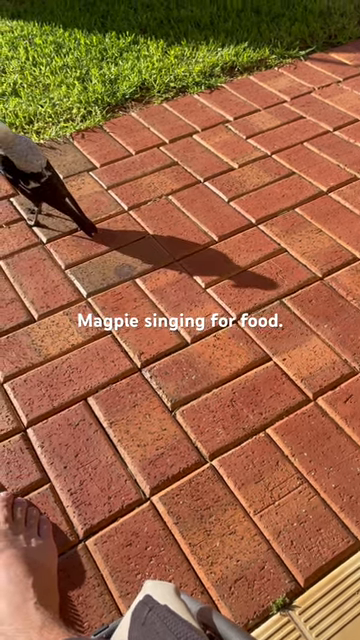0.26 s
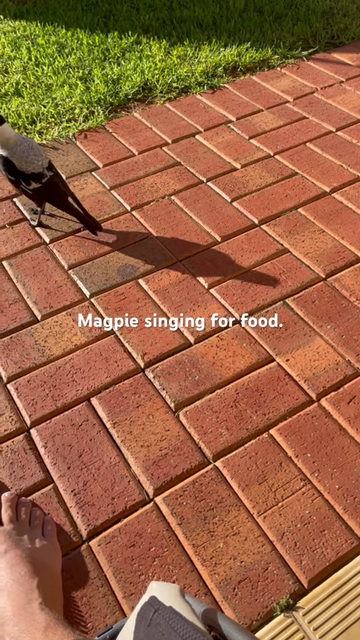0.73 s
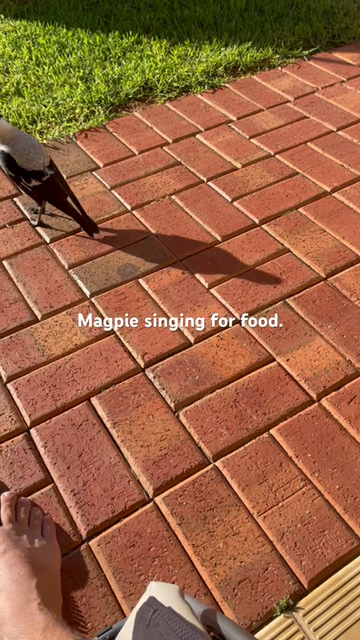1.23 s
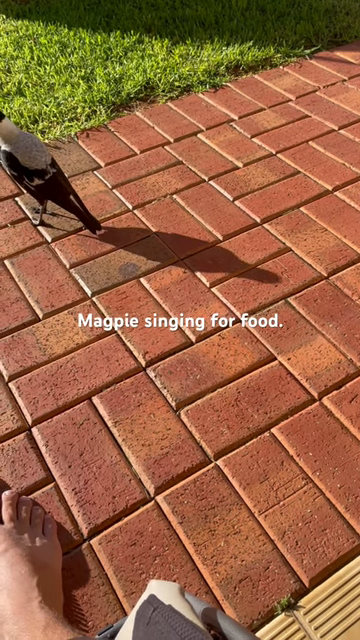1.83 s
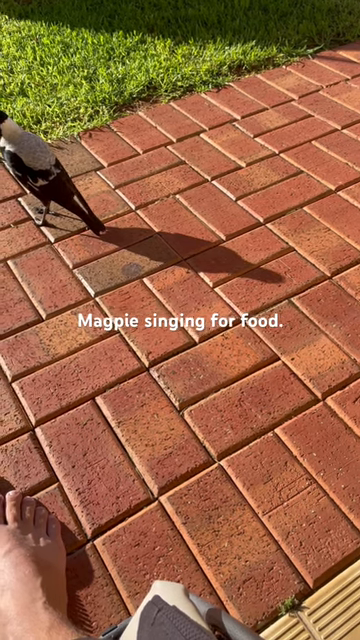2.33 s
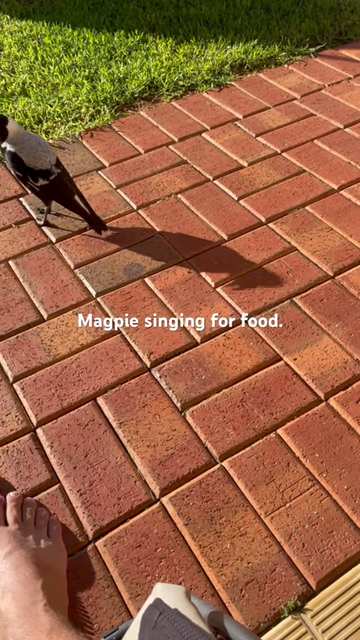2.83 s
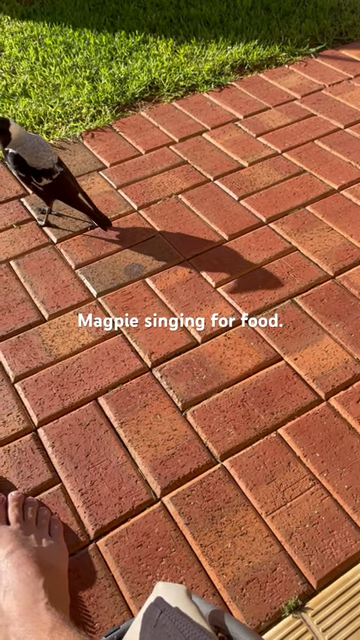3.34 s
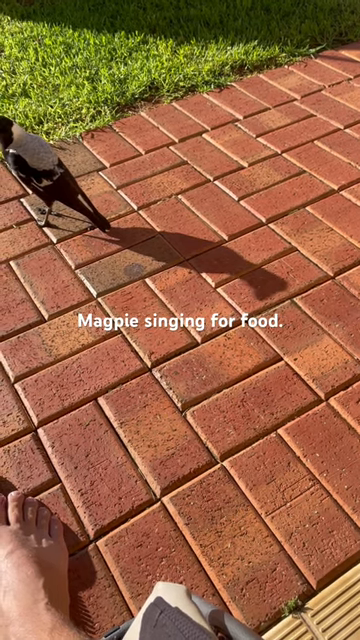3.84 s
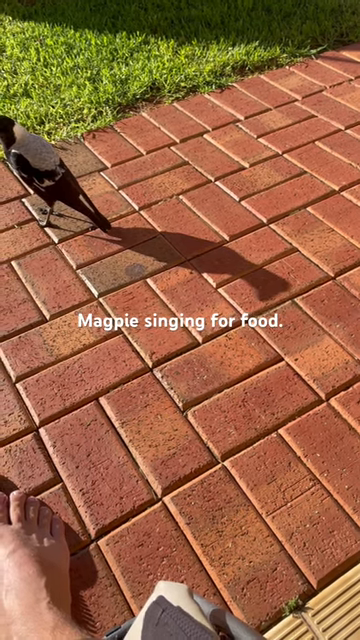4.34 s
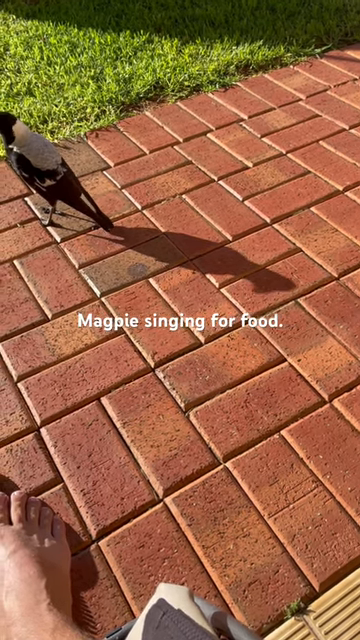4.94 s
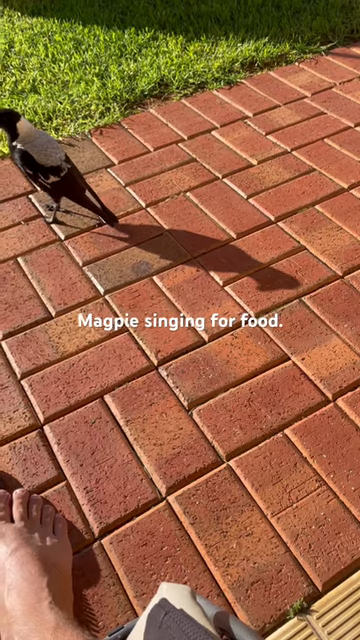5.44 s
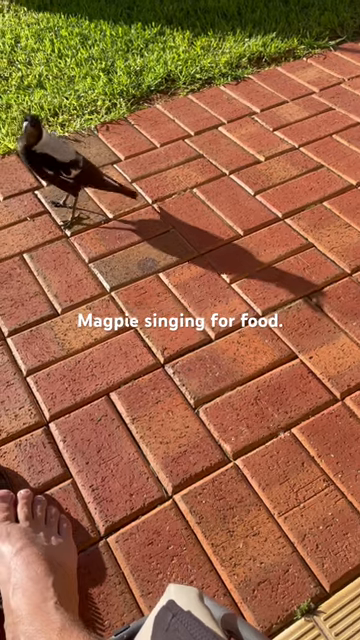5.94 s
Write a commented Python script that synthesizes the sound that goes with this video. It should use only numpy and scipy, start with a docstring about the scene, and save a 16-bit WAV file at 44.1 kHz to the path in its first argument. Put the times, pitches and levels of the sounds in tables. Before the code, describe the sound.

A magpie sings close to the microphone on a brick patio, with short reflections from nearby walls. It opens at once with a rapid fluttering warble falling away by 0.35 s, then a weaker swell and a brighter burst from 0.7 to 1.1 s. A sharp double-voiced slide comes at 1.16-1.3 s, with a short gargle near 1.4 s. From 1.5 to 2.7 s there are only faint chirps, soft rustles, dull taps and a small beak snap at 2.5 s. A harsh, breathy, two-toned squawk lasts from 2.77 to 3.0 s. Then fluting notes, quick upward flicks and gargling warbles follow in clusters, around 3.0-4.0 s, 4.1-4.55 s and 4.66-5.7 s, the last sagging and dying away. The final half second is nearly empty: echo tail, low traffic rumble, faint air and a distant motor hum, weaker than at the start.

```python
"""On a brick path a magpie sings close by: fluting notes, fast slides and gargling warbles from both sides of its
voice box, answered by nearby walls. Each note is a near sine with overtones, drawn as a curve of pitch and level.
A motor hums far off (two wavering sines) over low traffic rumble and air (shaped noise). A soft rustle (noise in
swells) comes and goes, with a few dull taps (short low rings in noise) and one snap of the beak."""
import sys
import numpy as np
from scipy import signal
from scipy.fft import rfft, irfft, next_fast_len
from scipy.io import wavfile
from scipy.ndimage import uniform_filter1d, map_coordinates

SR = 44100
rng = np.random.default_rng(int(sys.argv[2]) if len(sys.argv) > 2 else 0)


def attenuation_scalar(level_db):
    """Turn a level in dB into a linear amplitude multiplier (20 dB per decade)."""
    decades = np.asarray(level_db, float) / 20
    return 10 ** decades


def master(y):
    """Save y as 16-bit WAV."""
    cut = np.clip(np.atleast_2d(y).T, -1, 1)
    pcm = np.round(cut * 32767)  # scale
    wavfile.write(sys.argv[1], SR, pcm.astype(np.int16))


N = 272538  # length in samples

# The far motor's slow change in loudness: t/s, level/dB
HUM_LEVEL = [(0, -54), (1.2, -55.5), (2.8, -63), (6.18, -64.5)]
HUM_HZ, HUM_OCTAVE_DB = 83.2, -5  # mean pitch; level of the octave against it
# Loudness of rumble and air: t/s, rumble level/dB, air level/dB
RUMBLE_LEVELS = [(0, -61.5, -58.5), (1, -59, -64), (2, -60, -58), (2.6, -59, -64.5), (3.1, -58, -65),
                 (5, -55, -63), (6.18, -59.5, -65.5)]
# Tone of the deep traffic rumble, shape only: f/Hz, level per Hz/dB
RUMBLE_TONE = [(20, -47), (33, -21), (45, -0.5), (52, 8.5), (65, 0.5), (90, -9), (140, -34), (300, -120)]
# Tone of the air noise, shape only: f/Hz, level per Hz/dB
AIR_TONE = [(60, -34), (100, -4.5), (400, -17.5), (750, -17.5), (2000, -31.5), (4600, -49), (9000, -42),
            (15500, -42), (16500, -120)]
# Swells of the rustle: t/s, length/s, level/dB
RUSTLE_SWELLS = [(0, 0.32, -73), (.45, 0.21, -83), (.7, 0.27, -79), (1.35, .25, -66), (1.35, 0.63, -76),
                 (1.8, .05, -66), (1.96, 0.29, -62.5), (2.094, 0.15, -63), (2.35, 0.33, -73),
                 (2.8, 0.42, -62.5), (3.5, 0.62, -82.5), (4.2, .15, -67.5), (4.41, 0.05, -70.5),
                 (4.673, .04, -81), (4.836, .04, -74), (6, .2, -83.5)]
RUSTLE_REST_DB, RUSTLE_RISE_S, RUSTLE_FALL_S = -91, .06, 0.16
# Tone of the rustle, shape only: f/Hz, level per Hz/dB
RUSTLE_TONE = [(900, -29), (1500, -9.5), (2500, -6), (3100, -6), (3600, -4), (4500, -1), (5500, -2),
               (6300, -7.5), (9000, -10), (12500, -16), (15500, -17), (16500, -120)]
# How alike left and right are in the background: f/Hz, likeness (1 = the same, 0 = unrelated)
LIKENESS = [(50, 1), (90, .998), (150, .97), (300, .78), (1000, .6), (4000, .5), (10000, -.2)]

# Colour the throat gives to overtones: f/Hz, level/dB
THROAT_COLOUR = [(900, 18), (1800, 7), (2800, -3), (3700, -1.5), (5100, -8.5), (5700, -21), (6300, -18),
                 (7000, -31.5), (11000, -28.5)]
# Warbles that swell: t/s, top t/s, end t/s, from f/Hz, to f/Hz, start level/dB, top level/dB,
# beats per s, first beat/cycles, pitch swing/share
SWELLING = [(0, 0.163, .18, 1205, 1154, -30, -28, 109.5, .39, .025),
            (0.334, .42, .45, 855, 1031, -48.5, -40.5, 67.5, .02, 0.1),
            (.735, 0.857, .89, 913.6, 878.6, -38.5, -30, 60.5, 0.12, .072),
            (0.876, 0.922, .93, 1121, 1171, -38.5, -21.5, 79, .6, 0.045),
            (0.932, 0.942, .958, 1198, 1252, -30, -20.5, 79, .3, 0.036),
            (4.417, 4.465, 4.475, 984, 984, -29, -29, 78.5, .25, 0.085),
            (3.576, 3.683, 3.69, 1143, 1097, -40.5, -30.5, 88.5, .25, .09),
            (4.204, 4.308, 4.36, 870.5, 944.6, -33.5, -27, 92.5, .94, 0.084),
            (4.828, 4.857, 4.878, 895.7, 953.4, -29, -20.5, 157, .8, 0.036),
            (5.145, 5.274, 5.355, 867, 937, -48, -26.5, 56, -.15, .083),
            (5.353, 5.429, 5.445, 1094, 1229, -40, -27, 104, .74, .025)]
SWELL_END_DB, SWELL_OVERTONES_DB = -11.5, -38
# Slides and chirps: overtone level/dB, then a curve of (t/s, f/Hz, level/dB)
SLIDE_CURVES = [ (-29.5, [(0, 905, -31), (.03, 844.6, -43.5), (.11, 885, -56.5)]), (-5, [(.667, 479, -48.5),
                (.675, 442, -61.5), (.695, 957.8, -55.5)]), (-39, [(.705, 1296, -46.5), (.712, 1295, -33.5),
                (.724, 1338, -26), (.745, 1231, -33)]), (-36, [(1.155, 935, -45.5), (1.164, 1094, -25),
                (1.17, 1236, -24.5), (1.182, 1208, -50.5), (1.188, 1198, -20), (1.26, 1123, -31.5),
                (1.278, 1156, -52), (1.29, 1152, -30.5)]), (-36, [(1.17, 899, -59.5), (1.179, 887, -22.5),
                (1.188, 941, -31.5), (1.245, 1012, -28.5), (1.263, 893.6, -46), (1.272, 983, -34),
                (1.281, 1097, -46), (1.305, 981, -31.5)]), (-25.5, [(1.54, 3936, -66),
                (1.56, 3250, -58.5)]), (-34.5, [(1.822, 1897, -54.5), (1.838, 2042, -42),
                (1.856, 2166, -45), (1.862, 2670, -48.5), (1.878, 3900, -73)]), (-9, [(2.28, 652.5, -57.5),
                (2.294, 876, -51.5), (2.325, 1002, -52), (2.34, 1256, -46), (2.352, 1196, -48.5),
                (2.388, 1317, -46.5), (2.405, 1600, -68)]), (-5, [(2.495, 1091, -63.5), (2.503, 1298, -45),
                (2.519, 1120, -44), (2.534, 1395, -51.5), (2.555, 2774, -46), (2.569, 2208, -55),
                (2.582, 1430, -40), (2.59, 853, -50)]), (-20.5, [(2.645, 1206, -51), (2.657, 1376, -46),
                (2.673, 905, -54.5)]), (-27.5, [(3, 1211, -44), (3.021, 1324, -43), (3.03, 1367, -30.5),
                (3.039, 1284, -24.5), (3.045, 1279, -32), (3.068, 1119, -32.5)]), (-35, [(3.035, 1251, -32),
                (3.048, 1053, -32.5)]), (-44, [(3.33, 760, -52.5), (3.345, 1347, -34), (3.366, 1465, -49),
                (3.378, 1452, -41)]), (-30.5, [(3.35, 949, -59.5), (3.401, 1201, -44.5),
                (3.448, 967, -52.5), (3.47, 1228, -38.5)]), (-32.5, [(3.68, 1150, -30), (3.691, 1289, -16),
                (3.704, 1385, -24.5), (3.713, 1362, -38)]), (-23.5, [(3.725, 1522, -41), (3.737, 1426, -38),
                (3.747, 1445, -28.5), (3.757, 1274, -27.5)]), (-44.5, [(3.968, 908, -48.5),
                (3.985, 980, -33.5), (3.993, 911, -35.5)]), (-31, [(4.11, 888, -41), (4.119, 968, -58),
                (4.127, 1210, -32), (4.14, 1455, -51), (4.149, 2402, -49), (4.161, 2740, -50),
                (4.175, 2016, -78)]), (-26, [(4.15, 1240, -64), (4.163, 1395, -31), (4.186, 892, -46),
                (4.2, 857, -37)]), (-46.5, [(4.3, 972, -24), (4.315, 1140, -31), (4.322, 1015, -47)]),
                (-44, [(4.392, 994, -37), (4.402, 992, -37), (4.411, 1169, -21), (4.42, 1240, -42)]),
                (-34, [(4.66, 1066, -61.5), (4.672, 1157, -26), (4.69, 1195, -21), (4.7, 1258, -25),
                (4.713, 1418, -38)]), (-24, [(4.826, 865, -40), (4.845, 841, -32), (4.896, 760.7, -41.5)]),
                (-38.5, [(4.995, 1279, -45.5), (4.999, 1246, -36), (5.01, 920, -27), (5.024, 1363, -36),
                (5.045, 1434, -35.5), (5.09, 1395, -34), (5.138, 1275, -31), (5.15, 1260, -58)]),
                (-27.5, [(5.444, 1450, -58.5), (5.462, 1656, -42), (5.474, 1377, -56), (5.484, 1230, -40)]),
                ]
# Warbles that start loud and die away: t/s, length/s, entry f/Hz, f it settles to before sagging/Hz,
# level/dB, loss/dB, beats per s, first beat/cycles, pitch swing/share
TRAILING = [(0.196, .15, 1193, 860, -39, 12.5, 68.5, .5, .087),
            (0.946, 0.18, 1063, 927.5, -22, 27, 50.5, .8, .089),
            (1.366, 0.066, 800, 856, -32.5, 15.5, 70.5, .6, .082),
            (3.5, 0.095, 1293, 1200, -28, 12.5, 88.5, .89, 0.052),
            (3.988, 0.13, 906.5, 798, -34.5, 20, 64.5, -.1, 0.096),
            (4.469, .085, 1008, 1028, -37, 17.5, 86, .1, .079),
            (4.697, .115, 1174, 890, -21, 23.5, 53, .54, .08),
            (5.487, .21, 1049, 848.5, -31, 29.5, 52.5, .32, .086)]
SETTLE_S, SAG_PER_S, TRAIL_OVERTONES_DB = .018, .9, -34.5
FADE_SHARE = 0.53  # the loss eases out over this share of the length
# Held fluting notes: t/s, length/s, from f/Hz, to f/Hz, start level/dB, end level before release/dB
FLUTING = [(3.045, .078, 1055, 1029, -29, -26), (3.372, .128, 1405, 1361, -33, -23),
           (3.765, 0.084, 1014, 1000, -31.5, -25), (3.85, .088, 1020, 997, -39.5, -41.5),
           (4.325, .066, 1010, 1018.4, -41.5, -25.5), (4.93, .06, 826, 811, -43.5, -41.5),
           (4.89, 0.024, 995, 955, -50, -42.5), (1.31, .175, 730, 720, -46.5, -46.5),
           (3.5, 0.15, 2550, 2450, -65, -66.5)]
RELEASE_S, RELEASE_DB, FLUTE_OVERTONES_DB = .012, -9, -43
# Harsh squawk, one row per side of the voice box: overtone level/dB, beats per s, first beat/cycles,
# pitch swing/share, throb share, breath level/dB, then a curve of (t/s, f/Hz, level/dB)
SQUAWK_SIDES = [(-9, 100.5, -0.9, .08, 0.14, -25, [(2.772, 1293, -57.5), (2.779, 1278, -50.5),
                (2.791, 1809, -43), (2.815, 2124, -43.5), (2.87, 2095, -40.5), (2.902, 1960, -39),
                (2.929, 2091, -45.5), (2.94, 1942, -36), (2.959, 1917, -54.5), (2.971, 1509, -39),
                (3, 1981, -52)]), (2.5, 99, -.9, .05, 0.42, -28, [(2.78, 2307, -59), (2.81, 2450, -47),
                (2.83, 2707, -51.5), (2.915, 2480, -55.5)])]
EFFORT, LOUD_DB = .8, -25  # warble overtones gain EFFORT dB for each dB of level over LOUD_DB
THROB_PER_SWING = 2.75  # a wider pitch swing pumps the level harder

# Left-right difference of the bird against its middle: f/Hz, level/dB
BIRD_SIDE = [(300, -7), (1200, -20), (2200, -6.5), (5000, -5), (12000, 2)]
# First echoes from the walls: delay t/s, level/dB
EARLY_ECHOES = [(.004, -24), (0.009, -12.5), (.023, -17), (0.048, -25)]
# How long the echo tail takes to fall by 60 dB: f/Hz, t/s
TAIL_TIMES = [(500, 1), (1200, 0.45), (2500, 0.88), (6000, 0.21)]
# Dull taps: t/s, level before the soft onset/dB, ring f/Hz, time to fall by 60 dB/s
TAP_LIST = [(0.046, -33.5, 386, 0.035), (1.446, -40, 750, 0.024), (1.673, -45, 464, 0.051),
            (1.809, -42.5, 406, 0.039), (2.057, -33.5, 367, 0.043), (2.091, -40.5, 264, 0.072)]
# Dark stretches of the treble: f/Hz, level/dB
DARK_TREBLE = [(6300, 0), (6900, -12.5), (8200, -27), (8700, -4.5), (12800, -5), (13600, -18.5),
               (14600, -23), (15000, -5)]


def unit(x):
    """Scales x to an average (rms) level of 1."""
    return x / np.sqrt(np.mean(x ** 2) + 1e-20)


def along(points, hz):
    """Reads (Hz, value) points at any frequency, on a log axis."""
    f, v = np.transpose(points)
    return np.interp(np.log(hz + 1), np.log(f + 1), v)


def curves(rows, t):
    """Reads one value per time for each column after the first."""
    s, *cols = np.transpose(rows)
    return [np.interp(t, s, c) for c in cols]


def wobble(rate, size=N):
    """A smooth random curve through `rate` random points a second."""
    return map_coordinates(rng.standard_normal(size // 100 + 8), [np.arange(size) * rate / SR])


def filtered(x, response):
    """Multiplies the spectrum of x by a response given as a function of frequency."""
    m = next_fast_len(N + 8192)
    return irfft(rfft(x, m) * response(np.fft.rfftfreq(m, 1 / SR)), m)[..., :N]


def add_at(out, s, sound):
    """Adds a sound into out, starting at s seconds."""
    out[round(s * SR):][:len(sound)] += sound


def rush(tone, patchy_db):
    """Stereo noise of rms 1: many tiny random sounds, with patches in time and pitch of random gain."""
    z = signal.stft(rng.standard_normal((2, N)), nperseg=512)[2]
    field = rng.standard_normal(z.shape[1:])
    field = uniform_filter1d(uniform_filter1d(field, size=6, axis=0), size=10, axis=1)
    pair = signal.istft(z * attenuation_scalar(patchy_db * unit(field)), nperseg=512)[1][:, :N]

    def shares(hz):
        turn = np.arccos(np.clip(along(LIKENESS, hz), -1, 1)) / 2
        return attenuation_scalar(along(tone, hz)) * [np.cos(turn), np.sin(turn)]

    mid, side = filtered(pair, shares)
    return unit(np.array([mid + side, mid - side]))


def motor_hum():
    """A far motor: a low sine and its octave, both unsteady in pitch and level."""
    db, = curves(HUM_LEVEL, np.arange(N) / SR)
    turn = 2 * np.pi * np.cumsum(HUM_HZ + 0.65 * wobble(2.2)) / SR
    low = attenuation_scalar(0.52 * wobble(23)) * np.sin(turn)
    octave = attenuation_scalar(HUM_OCTAVE_DB + 0.52 * wobble(21)) * np.sin(2 * turn)
    return np.sqrt(2) * attenuation_scalar(db) * (low + octave)


def rumble_and_air():
    """Low traffic rumble and air: two layers of shaped noise, each with its own slow level."""
    rumble_db, air_db = curves(RUMBLE_LEVELS, np.arange(N) / SR)
    rumble = attenuation_scalar(rumble_db) * rush(RUMBLE_TONE, patchy_db=-1.0)
    return rumble + attenuation_scalar(air_db) * rush(AIR_TONE, patchy_db=2.0)


def rustle():
    """A soft rustle: patchy noise that rises and falls in rounded swells."""
    t = np.arange(N) / SR
    soft = lambda u: np.sin(np.pi / 2 * np.clip(u + .5, 0, 1)) ** 2
    level = attenuation_scalar(RUSTLE_REST_DB)
    for s, length, db in RUSTLE_SWELLS:
        level = level + attenuation_scalar(db) * soft((t - s) / RUSTLE_RISE_S) * soft((s + length - t) / RUSTLE_FALL_S)
    return level * rush(RUSTLE_TONE, patchy_db=2.5)


def note(rows, overtones_db, rate=0, first=0, swing=0, throb=0, breath_db=-12):
    """One membrane sings a near sine; a flutter flicks its pitch up and pumps its level."""
    fade = .004  # s
    t = np.arange(rows[0][0], rows[-1][0] + fade, 1 / SR)
    size = len(t)
    hz, db = uniform_filter1d(curves(rows, t), size=150, mode="nearest")  # muscles round every corner
    falling = np.clip(-np.gradient(np.log(hz)) * SR, 0, 60)  # how fast the pitch drops, per s

    beat = 2 * np.pi * (rate * (t - t[0]) - first + .11 * wobble(40, size))
    depth = np.exp(.3 * wobble(80, size))  # no two beats are alike
    flick = np.exp(1.423 * np.cos(beat + 1.0))  # peaked, and ahead of the level's beat
    hz = hz * (1 + depth * swing * (flick / flick.mean() - 1) + 0.0044 * wobble(150, size))
    pump = np.exp(2 * min(throb, .5) * depth * np.cos(beat) + 0.13 * wobble(110, size))

    turn = 2 * np.pi * (np.cumsum(hz) / SR + rng.random())
    k = np.arange(2, 10)[:, None]  # overtone numbers
    flicker = 1 + .55 * np.array([wobble(400, size) for _ in k])  # turbulence blurs each overtone
    overtones = np.sum(attenuation_scalar(along(THROAT_COLOUR, k * hz)) * flicker * np.sin(k * turn), axis=0)

    band = signal.butter(2, [1800, 5200], "band", fs=SR, output="sos")
    breath = unit(signal.sosfilt(band, rng.standard_normal(size)))
    puffs = attenuation_scalar(breath_db) * (1 + np.cos(turn)) * breath  # one puff per cycle

    # effort brightens; falls and flicks thin the tone
    bright = attenuation_scalar(overtones_db + 0.59 * (db - db.max()) - 0.38 * falling) / flick ** (6 * swing)
    tone = np.sin(turn) + bright * (overtones + puffs)
    edge = np.clip(np.minimum(t - t[0] + 1 / SR, t[-1] - t) / fade, 0, 1)
    return np.sqrt(2) * attenuation_scalar(db) * unit(pump) * edge * tone


def times(length):
    """Curve points every 3 ms."""
    return np.arange(0, length, .003)


def eased(u):
    """A rise from 0 to 1 that slows towards its end."""
    return np.sin(np.pi / 2 * np.clip(u, 0, 1))


def swelling_warbles():
    """Fluttering notes that grow to a top and then drop; louder ones are brighter."""
    for s, top, end, from_hz, to_hz, db, top_db, *flutter in SWELLING:
        t = times(end - s)
        rise = eased(t / (top - s))
        fall = np.clip((s + t - top) / (end - top), 0, 1)
        pitch = from_hz + (to_hz - from_hz) * rise
        level = db + (top_db - db) * rise + SWELL_END_DB * fall
        overtones_db = SWELL_OVERTONES_DB + EFFORT * (top_db - LOUD_DB)
        yield note(np.transpose([s + t, pitch, level]), overtones_db, *flutter, THROB_PER_SWING * flutter[-1]), s


def slides():
    """Slides and chirps: the pitch runs quickly from point to point."""
    for overtones_db, rows in SLIDE_CURVES:
        yield note(rows, overtones_db), rows[0][0]


def sum_tones(song):
    """Both sides share one windpipe: squeezing the loud peaks breeds sum tones in the treble."""
    squeezed = np.maximum(song - .025, 0)
    treble = lambda hz: attenuation_scalar(along(THROAT_COLOUR, hz)) * (hz / 2500) ** 3.1 * (hz > 1650)
    return attenuation_scalar(-29.5) * filtered(squeezed, treble)


def left_and_right(bird):
    """The bird reaches left and right a little differently, more so in the high treble."""
    side = filtered(bird, lambda hz: attenuation_scalar(along(BIRD_SIDE, hz)) * np.exp(.5j * np.pi * 1.1))
    return np.array([bird + side, bird - side])


def walls(x):
    """A few early echoes, then a tail in which each frequency dies at its own speed."""
    hz, t, z = signal.stft(rng.standard_normal((2, SR)), SR, nperseg=256)
    tail = signal.istft(z * attenuation_scalar(-60 * t / along(TAIL_TIMES, hz)[:, None]), SR, nperseg=256)[1]
    tail[1] = 0.58 * tail[0] + .6 * tail[1]  # left and right hear much the same tail
    tail = attenuation_scalar(-14) * np.pad(tail, ((0, 0), (600, 0))) / np.linalg.norm(tail[0])  # starts 600 samples late
    for s, db in EARLY_ECHOES:
        tail[:, round(s * SR)] += attenuation_scalar(db)
    return signal.fftconvolve(x[None], tail, axes=1)[:, :N]


def taps():
    """Dull soft knocks: a short low ring inside a puff of noise."""
    out, t = np.zeros(N), np.arange(SR // 10) / SR
    for s, db, hz, t60 in TAP_LIST:
        puff = signal.lfilter([.12], [1, -.88], rng.standard_normal(len(t)))
        body = np.sin(2 * np.pi * hz * t) + 1.7 * puff
        onset = 1 - np.exp(-t / 0.0043)
        add_at(out, s, attenuation_scalar(db - 60 * t / t60) * onset * body)
    return out


def trailing_warbles():
    """Fluttering notes that start loud and die away while the pitch settles and sags."""
    for s, length, entry_hz, hz, db, lost_db, *flutter in TRAILING:
        t = times(length)
        pitch = (hz + (entry_hz - hz) * np.exp(-t / SETTLE_S)) * (1 - SAG_PER_S * t)
        level = db - lost_db * np.expm1(-t / (FADE_SHARE * length)) / np.expm1(-1 / FADE_SHARE)
        overtones_db = TRAIL_OVERTONES_DB + EFFORT * (db - LOUD_DB)
        yield note(np.transpose([s + t, pitch, level]), overtones_db, *flutter, THROB_PER_SWING * flutter[-1]), s


def flutes():
    """Held notes without flutter: pitch and level ease over, then a quick release."""
    for s, length, from_hz, to_hz, db, end_db in FLUTING:
        t = times(length)
        rise = eased(t / (length - RELEASE_S))
        fall = np.clip(1 + (t - length) / RELEASE_S, 0, 1)
        pitch = from_hz + (to_hz - from_hz) * rise
        level = db + (end_db - db) * rise + RELEASE_DB * fall
        yield note(np.transpose([s + t, pitch, level]), FLUTE_OVERTONES_DB), s


def beak_snap():
    """The beak snaps: a fast-dying ring and an even shorter burst of noise."""
    t = np.arange(SR // 20) / SR
    ring = attenuation_scalar(-29.0 - 60 * t / .012) * np.sin(2 * np.pi * 640 * t)
    burst = signal.lfilter([.4], [1, -.6], rng.standard_normal(len(t)))
    return ring + attenuation_scalar(-30 - 60 * t / 0.0075) * burst


def squawk():
    """A harsh cry: both sides of the voice box sing at once, rich in overtones but with little breath."""
    for *manner, rows in SQUAWK_SIDES:
        yield note(rows, *manner), rows[0][0]


def magpie():
    """All the notes with their sum tones, and a snap of the beak as one slide starts."""
    song = np.zeros(N)
    for kind in (swelling_warbles, slides, trailing_warbles, flutes, squawk):
        for sound, s in kind():
            add_at(song, s, sound)
    bird = song + sum_tones(song)
    add_at(bird, 2.4995, beak_snap())
    return bird


def scene():
    """The bird, its echoes from the walls, the taps and the background together."""
    bird = magpie()
    background = motor_hum() + rumble_and_air() + rustle()
    return left_and_right(bird) + walls(bird) + taps() + background


def top_cut(x):
    """Nothing passes above the cut-off."""
    return signal.sosfilt(signal.butter(12, 15750, fs=SR, output="sos"), x)


def record(dry):
    """Darkens two stretches of the treble in the finished mix."""
    mix = filtered(dry, lambda hz: attenuation_scalar(along(DARK_TREBLE, hz)))
    return top_cut(mix)


dry = scene()
out = record(dry)
master(out)
```